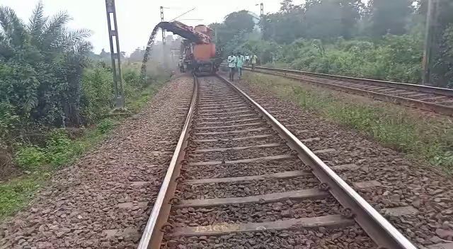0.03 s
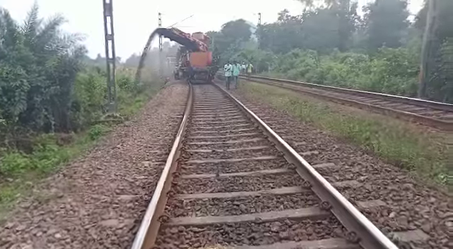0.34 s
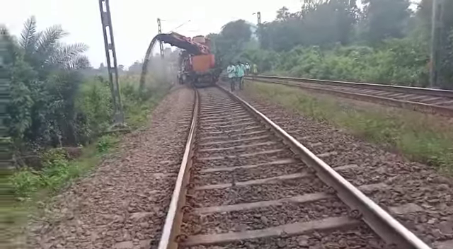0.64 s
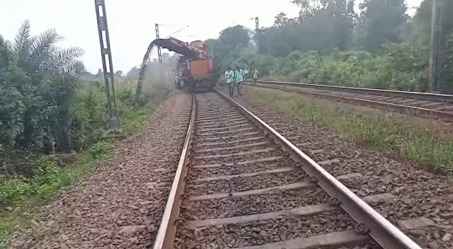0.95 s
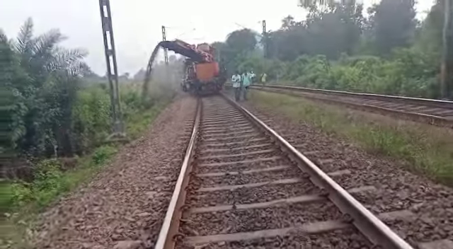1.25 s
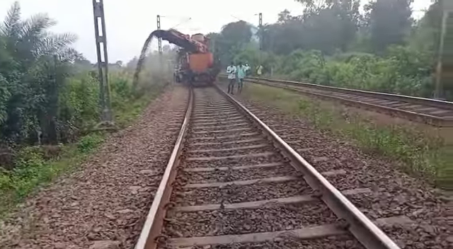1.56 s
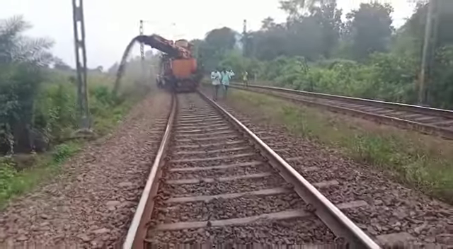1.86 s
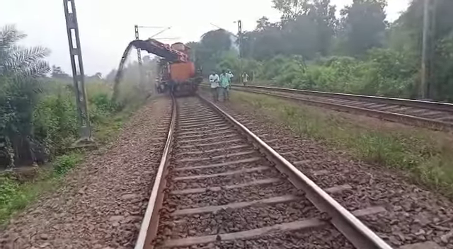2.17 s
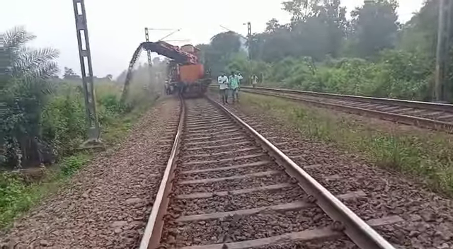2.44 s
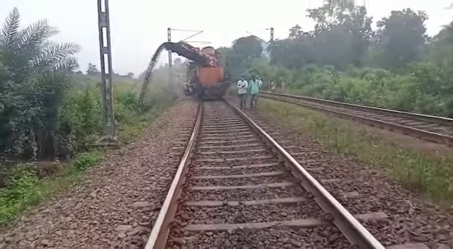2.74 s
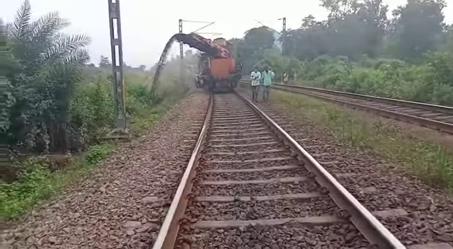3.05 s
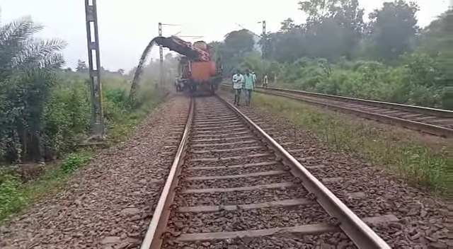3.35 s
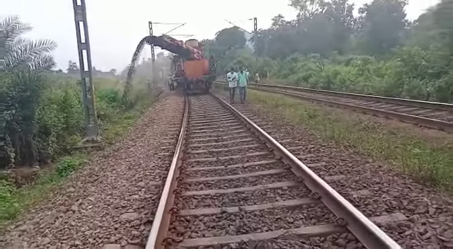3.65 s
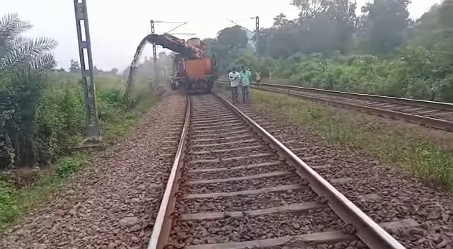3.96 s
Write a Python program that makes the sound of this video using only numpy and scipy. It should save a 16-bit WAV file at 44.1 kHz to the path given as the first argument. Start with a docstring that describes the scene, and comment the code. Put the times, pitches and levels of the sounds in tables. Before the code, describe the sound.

A railway ballast cleaning machine fades in over the first 0.3 seconds and works steadily some way off in open country. Its low diesel drone carries a wavering gear whine, irregular chain thuds and clanks, and a continuous rattle of stones. Faint grit ticks close to the microphone. Stones scrape on steel now and then, most clearly around 2.5 seconds. At about 3.8 seconds steel gives a short, stuttering squeal.

```python
"""A ballast cleaning machine at work in open country, some way down the track from a mono microphone.
Its diesel drones, a second shaft beats against it and a gear drive whines. The digging chain thuds and
clanks in its steel trough while ballast rattles over the screens. Grit ticks close to the microphone,
stones scrape now and then, and near the end steel sticks and slips in a short squeal. The sound fades in."""
import sys
import numpy as np
from scipy import signal
from scipy.fft import rfft, irfft, next_fast_len
from scipy.io import wavfile
from scipy.ndimage import uniform_filter1d, map_coordinates

SR = 44100
rng = np.random.default_rng(int(sys.argv[2]) if len(sys.argv) > 2 else 0)


def persist_wave(psi):
    """Save psi, clipped to +-1, as 16-bit WAV."""
    counts = np.round(np.clip(psi, -1, 1) * 32767).astype(np.int16)
    wavfile.write(sys.argv[1], SR, np.atleast_2d(counts).T)


N = 176400
TIME = np.arange(N) / SR


def amp(db):
    return 10 ** (np.asarray(db) / 20)


def unit_rms(x):
    return x / np.sqrt(np.mean(x ** 2) + 1e-20)


def curve(rows):
    """(time in seconds, value) points joined by lines."""
    return np.interp(TIME, *np.transpose(rows))


def wobble(rate):
    """A smooth random curve, rate knots a second."""
    return map_coordinates(rng.standard_normal(N // 20), [TIME * rate + 2], mode="wrap")


def filtered(x, response):
    """x through a gain that depends on frequency."""
    size = next_fast_len(N + SR // 2)
    return irfft(rfft(x, size) * response(np.fft.rfftfreq(size, 1 / SR)), size)[:N]


def coloured(x, spectrum):
    """x shaped by (Hz, dB) points, at rms 1."""
    points_hz, db = np.transpose(spectrum)
    return unit_rms(filtered(x, lambda hz: amp(np.interp(np.log(hz + 1), np.log(points_hz), db))))


def noise(spectrum):
    return coloured(rng.standard_normal(N), spectrum)


def tone(hz):
    """A sine of rms 1 that follows a pitch curve."""
    return np.sqrt(2) * np.sin(2 * np.pi * (np.cumsum(hz) / SR + rng.random()))


def blows(rows, rise_s, fall_s):
    """An envelope that swells to each (seconds, dB) peak and dies away."""
    return sum(amp(db) * np.exp(-np.where(TIME < s, ((TIME - s) / rise_s) ** 2, (TIME - s) / fall_s))
               for s, db in rows)


def impacts(rate, spread_db, fall_s):
    """Random collisions, rate a second, each a dying burst of noise."""
    hits = (rng.random(N) < rate / SR) * amp(spread_db * np.clip(rng.standard_normal(N), -2, 2))
    power = signal.lfilter([1], [1, -np.exp(-2 / (fall_s * SR))], hits ** 2)
    return np.sqrt(power) * rng.standard_normal(N)


# The diesel's speed. Each row: time in seconds, firing rate in Hz.
FIRING_RATE = [(0, 101.3), (.9, 99.7), (1.4, 100), (2.1, 100.3), (2.6, 99.24), (4, 99.04)]
# Its drone from down the track. Each row: multiple of the firing rate, relative level in dB.
FIRING_ORDERS = [(.5, -51.5), (1, -27), (2, -45.5), (3, -48.5)]
# The drone swells and sinks. Each row: time in seconds, gain in dB.
DRONE_GAIN = [(0, 0.5), (.5, -0.5), (1.3, 0.8), (2.1, -1.5), (2.8, -1.5), (3.3, 0), (4, -3)]
# Exhaust rumble. Each row: frequency in Hz, relative level in dB.
EXHAUST_SPECTRUM = [(20, -22), (40, -14), (65, -14), (85, 11.5), (100, 1), (125, -5.5), (170, -12.5),
                    (300, -39), (900, -120)]

def diesel(shaft_hz=85.4):
    """The cylinders fire in a drone over exhaust rumble, and a second shaft beats against them."""
    firing_hz = curve(FIRING_RATE) + 0.25 * wobble(7.28)
    drone = sum(amp(db + 0.61 * wobble(6.7)) * tone(order * firing_hz) for order, db in FIRING_ORDERS)
    shaft = amp(-43 + 0.52 * wobble(2.65)) * tone(shaft_hz + 0.35 * wobble(2.8))
    exhaust = amp(-34.5) * noise(EXHAUST_SPECTRUM)
    return amp(curve(DRONE_GAIN)) * drone + shaft + exhaust


# The gear whine. Each row: multiple of the mesh rate, relative level in dB.
MESH_HARMONICS = [(9, -49), (10, -40.5), (11, -35.5), (12, -61), (19, -50.5), (20, -54), (21, -49),
                  (27, -50.5)]
# The whine comes and goes at the microphone. Each row: time in seconds, gain in dB.
WHINE_GAIN = [(0, -7), (.4, -1.5), (.6, -0.5), (1, -0.5), (1.5, -5.5), (1.8, 2), (2.1, -3), (2.4, 1.5),
              (2.95, 2.5), (3.2, 1), (3.38, -8), (3.55, -0.5), (4, -1)]
MESH_HZ = 72.05

def gear_drive(flutter_db=3.5, waver_hz=2):
    """Meshing teeth whine; each harmonic flutters on its way through the open air."""
    mesh_hz = MESH_HZ * (1 + 0.0011 * wobble(6))
    whine = sum(amp(db + flutter_db * wobble(25.98)) * tone(k * mesh_hz + waver_hz * wobble(60))
                for k, db in MESH_HARMONICS)
    return amp(curve(WHINE_GAIN)) * whine


# The steel trough's modes. Each row: frequency in Hz, width in Hz, relative level in dB.
TROUGH_MODES = [(203.2, 44.8, -5), (252.8, 64.5, 4), (303.4, 55, 6)]
# The chain thuds and its links clank. Each row: peak time in seconds, relative level in dB.
CHAIN_THUDS = [(0.354, -21), (0.42, -28), (0.468, -23.5), (0.541, -21), (0.632, -24), (0.769, -26),
               (0.83, -22), (0.911, -23.5), (0.974, -36), (1.062, -19), (1.12, -19), (1.406, -31),
               (1.47, -36), (1.555, -19.5), (1.695, -22), (1.828, -18.5), (1.966, -20.5), (2.238, -27),
               (2.312, -28), (2.503, -22), (2.849, -21.5), (2.915, -26), (3.01, -30), (3.107, -23.5),
               (3.229, -25), (3.285, -21.5), (3.369, -26), (3.42, -21), (3.555, -28), (3.609, -25),
               (3.675, -23), (3.739, -23.5)]
LINK_CLANKS = [(0.318, -24), (0.619, -36), (1.135, -24), (1.165, -22), (1.382, -25), (1.6, -28),
               (1.704, -30), (1.768, -24), (1.961, -24), (2.075, -23), (2.138, -20), (2.282, -25),
               (2.418, -25), (2.49, -33), (2.559, -25.5), (2.69, -25), (2.77, -25.5), (2.956, -28),
               (3.108, -25), (3.2, -36), (3.285, -23.5)]
# The chain's low rumble and its brighter links. Each row: frequency in Hz, relative level in dB.
RUMBLE_SPECTRUM = [(20, -45), (100, -11), (150, -9), (200, 1), (260, 1.5), (320, -1.5), (380, -4),
                   (460, -9.5), (550, -18.5), (800, -15), (2500, -120)]
LINK_SPECTRUM = [(100, -60), (450, -45), (570, -16), (660, -8.5), (760, -0.5), (900, -1), (1000, -4),
                 (1090, -9), (1170, -51), (1500, -33), (4000, -120)]
# The rattle of links and ballast rises and falls. Each row: time in seconds, gain in dB.
RATTLE_GAIN = [(0, -1), (1.2, -1.5), (1.8, -0.65), (2.5, -0.86), (2.9, -2), (4, -0.9)]

def digging_chain(shake_depth=0.21):
    """The trough booms under each thud; the links clank, and rattle as the gear teeth shake them."""
    boom = unit_rms(sum(amp(db) * tone(hz + width / 2 * wobble(90)) for hz, width, db in TROUGH_MODES))
    thuds = amp(-5) * blows(CHAIN_THUDS, rise_s=0.017, fall_s=0.038) * boom
    knocks = impacts(rate=200, spread_db=3, fall_s=0.036)
    rumble = amp(-30.5 + 0.43 * wobble(7.3)) * coloured(knocks, RUMBLE_SPECTRUM)
    shake = 1 + shake_depth * tone(np.full(N, MESH_HZ))
    link_hits = shake * impacts(rate=220, spread_db=0, fall_s=0.018)
    rattle = amp(-32.5 + curve(RATTLE_GAIN) + 0.44 * wobble(26)) * coloured(link_hits, LINK_SPECTRUM)
    clanks = amp(-4) * blows(LINK_CLANKS, rise_s=0.0099, fall_s=0.017) * noise(LINK_SPECTRUM)
    return thuds + rumble + rattle + clanks


def clinks(pitch_hz, log_spread, decay_cycles, spread_db, count):
    """Stones ring briefly at random times, each at its own pitch; rms 1."""
    starts = (rng.random((count, 1)) * N).astype(int)
    hz = np.clip(pitch_hz * np.exp(log_spread * rng.standard_normal((count, 1))), 500, SR / 2)
    strength = amp(spread_db * np.clip(rng.standard_normal((count, 1)), -2, 2))
    age = np.arange(SR // 40)  # 25 ms of samples
    cycles = hz * age / SR
    rings = strength * np.sin(2 * np.pi * cycles) * np.exp(-cycles / decay_cycles)
    return unit_rms(np.bincount((starts + age).ravel(), rings.ravel(), N)[:N])


def patchy(x, depth_db):
    """Narrow bands of x swell and fade by chance; rms 1."""
    bands = signal.stft(x, nperseg=1024)[2]
    swell = uniform_filter1d(rng.standard_normal(bands.shape), size=2, axis=0)  # across frequency
    swell = unit_rms(uniform_filter1d(swell, size=7, axis=1))  # across time
    return unit_rms(signal.istft(bands * amp(depth_db * swell), nperseg=1024)[1][:N])


# Ballast on the screens, heard from a distance. Each row: frequency in Hz, relative level in dB.
STONE_SPECTRUM = [(300, -52), (600, -13.5), (1050, -2.5), (1200, -8), (1500, -0.5), (1750, -3.5),
                  (1950, -1), (2150, -6.5), (2400, -2), (2650, -4.5), (2950, -3), (3170, -7), (3470, -1),
                  (3900, -9.5), (4400, -7.5), (4780, -15.5), (5300, -13), (5600, -16), (6600, -17.5),
                  (8000, -16), (9200, -22), (9900, -30), (10800, -34.5), (11600, -35), (13000, -40),
                  (15500, -39.5)]
# The stones' hiss brightens and dulls. Each row: time in seconds, treble gain in dB.
HISS_GAIN = [(0, -5), (.6, -1), (1.15, .5), (1.55, 1), (2, -1), (2.52, 1.5), (2.9, 0), (3.2, .5), (4, -1)]

def ballast(hiss_above_hz=5500):
    """Stones clink on the screens over a wash of many more."""
    stones = clinks(pitch_hz=3786, log_spread=0.65, decay_cycles=72, spread_db=5, count=5000)
    wash = patchy(impacts(rate=1500, spread_db=1, fall_s=0.012), depth_db=2.1)
    flow = amp(-40) * coloured(stones, STONE_SPECTRUM) + amp(-29.5) * coloured(wash, STONE_SPECTRUM)
    hiss = filtered(flow, lambda hz: hz ** 4 / (hz ** 4 + hiss_above_hz ** 4))
    flow = flow - hiss + amp(curve(HISS_GAIN)) * hiss
    return amp(curve(RATTLE_GAIN) + 0.4 * wobble(12)) * flow


# Grit ticks near the microphone. Each row: peak time in seconds, level in dB.
GRIT_TICKS = [(.35, -55), (.418, -54), (.464, -45), (.678, -50), (.837, -51), (1.567, -55), (1.912, -49),
              (2.036, -56), (2.112, -54), (3.04, -48), (3.222, -53)]
# The chips and the finer patter. Each row: frequency in Hz, relative level in dB.
CHIP_SPECTRUM = [(2000, -20), (6000, -26), (9000, 14), (12000, 1), (16000, -14)]
PATTER_SPECTRUM = [(1000, -50), (5000, -14), (8500, 5), (10500, -11), (11700, -2), (12600, -19),
                   (16000, -26)]

def grit():
    """Small bright ticks close by, each a spray of tiny chips, over a faint patter."""
    patter = amp(-57) * coloured(impacts(rate=70, spread_db=4, fall_s=0.005), PATTER_SPECTRUM)
    chips = coloured(impacts(rate=1400, spread_db=5, fall_s=0.0014), CHIP_SPECTRUM)
    return blows(GRIT_TICKS, rise_s=0.0045, fall_s=0.013) * chips + patter


# Stones on steel. Each row: peak time in seconds, level in dB, middle pitch in Hz,
# log spread of the pitch, decay in seconds.
STONE_SCRAPES = [(0.418, -30.5, 3000, 0.217, 0.038), (0.635, -33, 1700, 0.13, 0.052),
                 (1.122, -30, 1990, 0.15, 0.02), (1.657, -28, 3150, 0.086, 0.027),
                 (1.769, -30, 2700, .25, 0.012), (2.437, -27.5, 2580, 0.057, .024),
                 (2.465, -25, 2670, 0.15, .022), (2.558, -29.5, 2090, .22, 0.045),
                 (3.104, -31, 2800, 0.0081, .022), (3.168, -30, 2455, 0.25, .04),
                 (3.566, -32.5, 3520, 0.043, .02)]

def scrapes():
    """Stones scrape and ring on steel, each scrape a brief swell of dense clinks."""
    return sum(blows([(peak_s, db)], rise_s=0.014, fall_s=decay_s)
               * clinks(hz, log_spread, decay_cycles=15, spread_db=3, count=2500)
               for peak_s, db, hz, log_spread, decay_s in STONE_SCRAPES)


# The bursts of the squeal. Each row: start in seconds, length in seconds, level in dB.
SQUEAL_BURSTS = [(3.808, .03, -31.5), (3.853, 0.038, -29), (3.91, 0.088, -40)]

def squeal(pitch_hz=2350, waver_hz=21.8):
    """Steel sticks and slips on steel at one wavering pitch."""
    envelope = np.zeros(N)
    for start_s, length_s, db in SQUEAL_BURSTS:
        progress = np.clip((TIME - start_s) / length_s, 0, 1)
        envelope += amp(db) * np.sqrt(abs(np.sin(np.pi * progress)))
    return envelope * tone(pitch_hz + waver_hz * wobble(250))


def scene():
    """The machine down the track and the grit nearby, at one microphone."""
    return (diesel() + gear_drive() + digging_chain() + ballast() + grit() + scrapes() + squeal())[None]


def record(dry, open_s=0.078, gate_s=0.0077, fade_s=0.26, top_hz=15550):
    """The recorder opens, fades in and keeps nothing above its band limit."""
    elapsed = TIME - open_s
    gate = np.clip(elapsed / gate_s, 0, 1) ** 2
    first_gain, leak = amp(-20.5), amp(-73)
    fade = first_gain + (1 - first_gain) * np.clip(elapsed / fade_s, 0, 1) ** 1.14
    return filtered(dry[0] * (gate * fade + leak), lambda hz: hz < top_hz)[None]


dry = scene()
out = record(dry)
persist_wave(out)
```